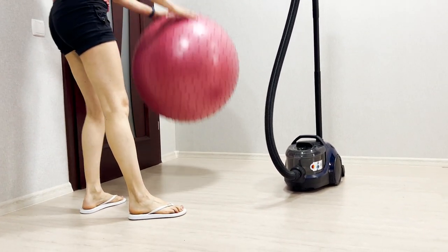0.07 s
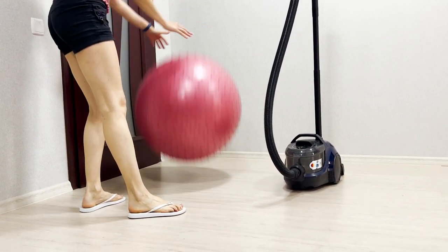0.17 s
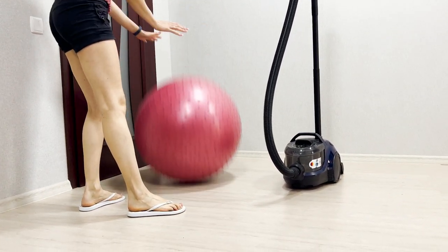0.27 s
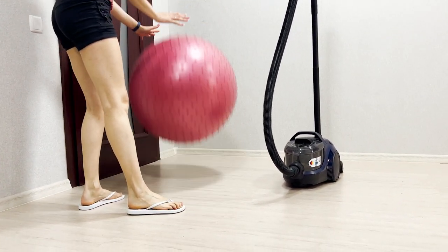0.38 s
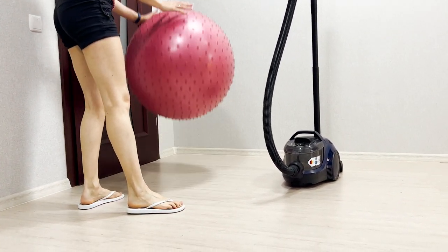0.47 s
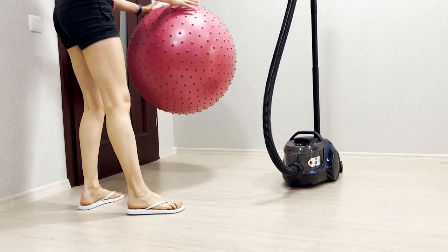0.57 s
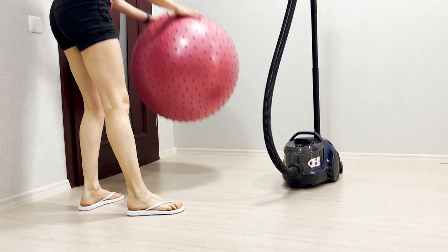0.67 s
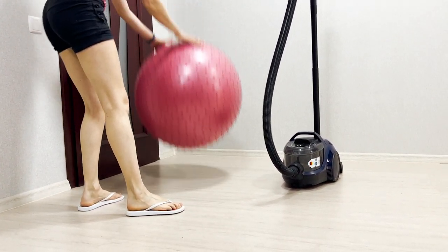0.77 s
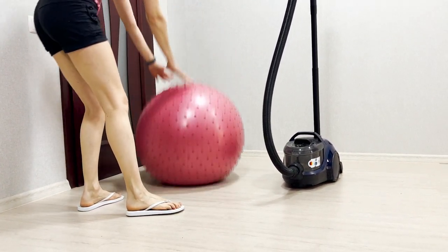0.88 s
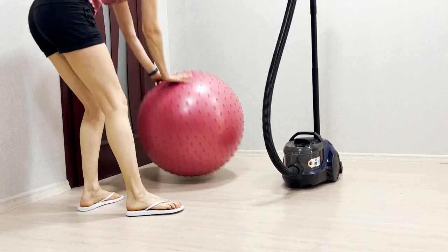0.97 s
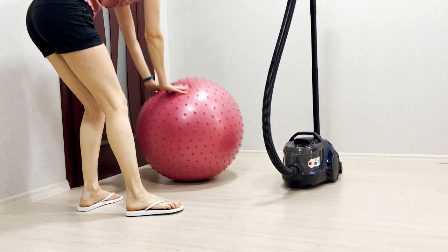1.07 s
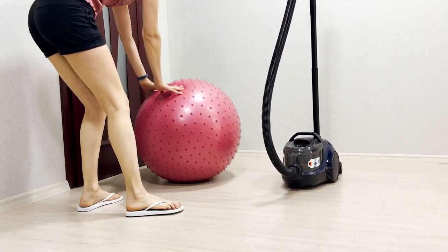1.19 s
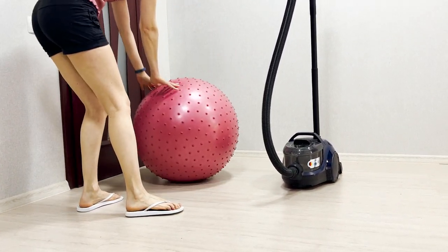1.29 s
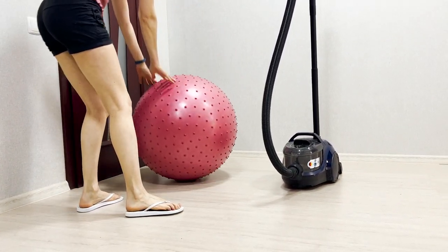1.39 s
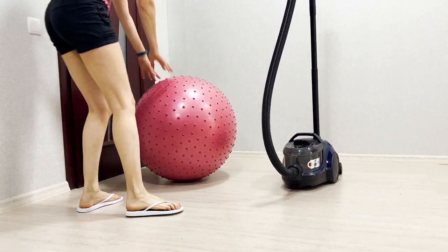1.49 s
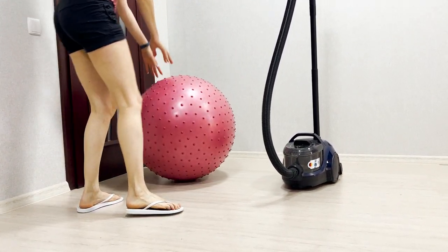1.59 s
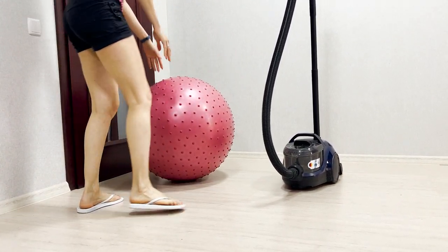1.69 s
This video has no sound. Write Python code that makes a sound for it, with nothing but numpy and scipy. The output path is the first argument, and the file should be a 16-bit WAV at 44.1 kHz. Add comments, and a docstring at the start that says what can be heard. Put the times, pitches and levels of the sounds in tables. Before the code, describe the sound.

A big air-filled rubber ball bounces on a hard floor in a small bare room, heard close in stereo. A dull hand pat at 0.02 s, then a loud slapping, booming landing at 0.25 with hollow ring. Soft pat at 0.45, faint ticks near 0.6, a weaker, pingy landing at 0.88, catching pats, a muffled thud at 1.02, then nudges, rubbing and rustle until about 1.5 over quiet room tone.

```python
"""Rubber ball on a hard floor

A big air-filled ball bounces in a small bare room, heard on a close pair of microphones, then is caught.
Each landing is a noise slap of the skin, a thump as the ball squashes and a ring of decaying air modes.
Hand pats are dulled thuds and brushes, the first with low swells after it; nudges and rubbing steady it.
The contacts have fading noise echoes, each landing adds a low boom, and a quiet room tone lies below."""
import sys
import numpy as np
from scipy import signal
from scipy.fft import rfft, irfft, next_fast_len
from scipy.io import wavfile

SR = 44100
rng = np.random.default_rng(int(sys.argv[2]) if len(sys.argv) > 2 else 0)


def unload_audio(sound):
    """Save the sound as a 16-bit wav file, at the path given as the first command line argument."""
    columns = np.transpose(np.atleast_2d(sound))
    # keep every value between -1 and 1, then stretch to whole-number steps
    steps = np.round(np.clip(columns, -1, 1) * 32767)
    wavfile.write(sys.argv[1], SR, steps.astype(np.int16))


N = 74970
T = np.arange(N) / SR
SIZE = 2 * next_fast_len(N)
HZ = np.maximum(np.fft.rfftfreq(SIZE, 1 / SR), 1)

# Landings on the floor [t/s, slap level/dB, slap fall/s, crack level/dB re slap, slap low-pass f/Hz,
# thump level/dB, squash/s, rebound level/dB, boom level/dB, air ring level/dB, high ping level/dB]
BOUNCES = [(.246, -14.5, 0.0054, 6, 8070, -14, 0.016, -4.5, -21, -21.5, -37.5),
           (.883, -17.5, 0.0087, 4, 6400, -19, 0.0063, -41.5, -18, -35, -20),
           (1.021, -25.5, 0.019, -33.5, 2080, -23, 0.03, -17, -23, -52, -30.5)]
# Slap of the skin [f/Hz, relative level/dB per Hz]
SLAP = [(150, -6.5), (400, -0.5), (560, -5), (1050, -1.5), (1450, -1), (1800, -4.5), (2500, -8.5),
        (3200, -12), (4200, -19.5), (5600, -29.5), (8200, -28), (10000, -56.5), (12500, -29), (15500, -38)]
SLAP_RISE_S, SLAP_WET_DB = 0.0079, -1
# First crack of skin on floor [f/Hz, relative level/dB per Hz]
CRACK = [(200, -16), (750, 2), (1400, 1), (2500, 0.5), (3400, -5.5), (4800, -17.5), (6000, -30),
         (9500, -49.5), (15000, -46.5)]
CRACK_AFTER_S, CRACK_WIDTH_S = 0.0036, 0.0025
# Thump of the squashed ball, also under pats and nudges [f/Hz, relative level/dB per Hz]
THUMP = [(25, -33), (45, -36), (70, -9.5), (115, -4), (170, -4), (260, -7), (360, -12), (520, -28.5),
         (1200, -72.5)]
THUMP_FALL_S, THUMP_WET_DB = 0.024, -1.5
# Low modes of ball and room, also in the pats and swells [f/Hz, level/dB, t60/s]
BODY = [(85.1, -6.5, 0.63), (110.96, 4.5, 0.31), (140.9, -7, 0.098), (164.3, -5.5, 0.25),
        (204.4, -10.5, 0.5), (236.4, -3, 0.28), (285.6, -14.5, 0.44), (325, -20.5, 0.45)]
BODY_RISE_S, BODY_DB = 0.026, 1  # level re the thump
# First push of air as the ball flattens; level re the thump
PUSH_S, PUSH_HZ, PUSH_WIDTH_S, PUSH_DB = 0.009, 181, 0.0033, 3.5
REBOUND_S, REBOUND_HZ, REBOUND_WIDTH_S = 0.02304, 133, 0.0075
# Air inside the ball [f/Hz, level/dB, t60/s]
AIR = [(367, 1.5, .36), (460, -9, .28), (660, -5, .3), (877, -9, .33), (1071, -4, .32), (1305, -12, .33),
       (1776, -7, .33), (2211, -7, .3), (2329, -9, .32), (2499, -10, .32), (2866, -8, .26)]
# High pings of the taut ball [f/Hz, level/dB, t60/s]
PING = [(1019, -8.5, 0.25), (1696, 0.5, 0.27), (1724, -5.5, 0.33), (1780, -13.5, 0.51), (2016, -6, 0.16)]
# Weak, long after-ring of the many high air modes [f/Hz, relative level/dB per Hz]
SHIMMER = [(500, -39), (1000, -0.5), (1700, -7), (2800, -2), (3900, -10.5), (5500, -31), (9000, -49)]
SHIMMER_DB, SHIMMER_T60_S = -27.5, 1.274  # level re the slap; decay before the catch
CAUGHT_S, CAUGHT_T60_S = 0.89, 0.33  # extra damping of the after-ring from the catch on
BOOM_HZ, BOOM_T60_S, BOOM_RISE_S = 55.97, 0.8, 0.026


def landings():
    """Skin slaps the floor, the ball squashes and rebounds, air and room ring; hands damp the shimmer."""
    out = 0
    boom = ring([(BOOM_HZ, 0, BOOM_T60_S)]) * rise(BOOM_RISE_S)
    hand_damping = 1000 ** (-np.maximum(T - CAUGHT_S, 0) / CAUGHT_T60_S)
    for (s, slap_db, fall_s, crack_db, dull_hz, thump_db, squash_s,
         rebound_db, boom_db, air_db, ping_db) in BOUNCES:
        crack_shape = np.exp(-((T - CRACK_AFTER_S) / CRACK_WIDTH_S) ** 2)
        crack = undb(crack_db) * noise(CRACK) * crack_shape
        skin = burst(SLAP, SLAP_RISE_S, fall_s, SLAP_WET_DB)
        slap = dull(crack + skin, dull_hz, order=1)

        squash = burst(THUMP, squash_s, THUMP_FALL_S, THUMP_WET_DB)
        body = undb(BODY_DB) * ring(BODY) * rise(BODY_RISE_S)
        push = undb(PUSH_DB) * swing(PUSH_S, PUSH_HZ, PUSH_WIDTH_S)
        thump = squash + body - push
        rebound = undb(rebound_db) * swing(REBOUND_S, REBOUND_HZ, REBOUND_WIDTH_S)

        hollow = (undb(air_db) * ring(AIR) + undb(ping_db) * ring(PING)) * rise(SLAP_RISE_S)
        shimmer = undb(slap_db + SHIMMER_DB) * noise(SHIMMER) * 1000 ** (-T / SHIMMER_T60_S)
        landing = undb(slap_db) * slap + undb(thump_db) * thump + rebound + undb(boom_db) * boom + hollow
        out = out + at(landing, s) + hand_damping * at(shimmer, s)
    return out


# Hand pats on the ball; the rows at 0.076 and 0.138 s are low swells of its ringing after the first pat
# [t/s, thud level/dB, onset/s, low-pass f/Hz of thud and wobble, wobble level/dB, skin brush level/dB]
PATS = [(.020, -23, .005, 139, -21.5, -41), (0.076, -38.5, 0.012, 108.8, -35, -67),
        (0.138, -39.5, 0.02, 108.8, -36.5, -73.5), (0.448, -29.5, 0.024, 430, -40.5, -47.5),
        (.678, -36.5, 0.012, 430, -42.5, -59.5), (0.721, -41.5, 0.015, 265.5, -40, -78.5),
        (0.834, -43.5, 0.015, 200, -48, -78), (0.937, -29, .008, 286, -32, -40.5),
        (0.967, -21.5, 0.0037, 215, -25, -63.5)]
PAT_FALL_S = 0.022
# Skin brush and rustle [f/Hz, relative level/dB per Hz]
FINGER = [(200, 15.5), (1000, 1), (2000, 0), (3400, -5), (4700, -6.5), (5900, -10.5), (7000, -11),
          (8800, -16), (10000, -37), (12500, -10), (15500, -39)]
# Sliding of hands and clothes [t/s, level/dB]
RUSTLE = [(0, -52), (.2, -58), (.6, -72), (.74, -63.5), (.85, -55.5), (1.1, -48), (1.26, -56),
          (1.31, -62.5), (1.39, -59.5), (1.5, -105), (1.63, -79), (1.7, -74)]
# Fingertip click on the skin [f/Hz, relative level/dB per Hz]
TAP_COLOUR = [(500, -4.5), (3000, -11), (4600, 2), (5900, -7), (7200, -7), (8800, -12), (10000, -30),
              (12500, -7.5), (15500, -20)]
TAP_S, TAP_DB = 0.0325, -33


def pats_and_rustle():
    """Pats and low swells: thud, wobble and skin brush; a fingertip clicks; hands and clothes rustle."""
    rustle = noise(FINGER) * undb(np.interp(T, *np.array(RUSTLE).T))
    out = rustle
    for s, thud_db, onset_s, dull_hz, wobble_db, brush_db in PATS:
        thud = undb(thud_db) * burst(THUMP, onset_s, PAT_FALL_S, wet_db=-11.0)
        modes = undb(-6.0) * ring(BODY) * rise(onset_s)
        wobble = undb(wobble_db) * (modes + swing(after_s=0.012, hz=91, width_s=0.013))
        brush = undb(brush_db) * burst(FINGER, rise_s=0.0027, fall_s=0.03, wet_db=2.0)
        out = out + at(dull(thud + wobble, dull_hz) + brush, s)
    tap = undb(TAP_DB) * burst(TAP_COLOUR, rise_s=0.002, fall_s=0.004, wet_db=-7.0)
    return out + at(tap, TAP_S)


# Short pushes on the held ball [t/s, level/dB]
NUDGES = [(1.099, -20.5), (1.222, -33), (1.317, -36), (1.376, -33), (1.420, -34), (1.454, -45)]
NUDGE_HZ, NUDGE_WIDTH_S, NUDGE_THUD_DB = 99, 0.01, -14.5  # thud level re the push


def nudges():
    """The held ball is nudged into place: each push is a short swing of pressure and a dull thud."""
    out = 0
    for s, db in NUDGES:
        push = swing(s, NUDGE_HZ, NUDGE_WIDTH_S)
        thud = noise(THUMP) * rise(NUDGE_WIDTH_S) * np.exp(-T / PAT_FALL_S)
        out = out + undb(db) * (push + undb(NUDGE_THUD_DB) * at(thud, s))
    return out


# Skin dragging on the floor as the ball is steadied [t/s, level/dB]
DRAG = [(1.0, -88), (1.15, -50.5), (1.3, -59), (1.43, -55), (1.49, -63.5), (1.54, -99), (1.7, -102)]
# Its colour [f/Hz, relative level/dB per Hz]
DRAG_COLOUR = [(60, -7.5), (300, 5.5), (550, -9.5), (1100, -10), (2000, -20.5), (4000, -28.5),
               (9000, -53.5)]


def drag():
    """The held ball rubs softly on the floor: coloured friction noise with a moving level."""
    times, levels_db = np.array(DRAG).T
    return noise(DRAG_COLOUR) * np.interp(T, times, undb(levels_db), left=0)


# Faint dry ticks [t/s, level/dB]
TICKS = [(.578, -38), (0.617, -38)]


def ticks():
    """Small dull clicks: very short swings of pressure with no echo."""
    tick = swing(after_s=0.00084, hz=685, width_s=0.00046)
    return sum(undb(db) * at(tick, s) for s, db in TICKS)


# Quiet of the room [f/Hz, relative level/dB per Hz]
QUIET = [(15, -42.5), (25, -6.5), (86, -3), (573, -33), (927, -17), (1280, -23.5), (1630, -22),
         (1960, -35.5), (10000, -51)]
QUIET_DB = -64


def room_tone():
    """Steady, mostly low noise under everything."""
    return undb(QUIET_DB) * noise(QUIET)


# Decay of the small bare room [f/Hz, t60/s]
ROOM = [(60, 0.12), (150, 0.6), (400, 0.25), (1000, 0.38), (2500, 0.46), (5000, 0.39), (9000, 0.3),
        (15000, 0.26)]
ROOM_BUILD_S = 0.0095


def room_tail(spectrum):
    """Diffuse echo: every octave band of noise fades with the decay time of the room."""
    source, out = rfft(noise(spectrum), SIZE), 0
    octaves = np.arange(4, 15)  # band centres at 2 ** k Hz
    for k in octaves:
        share = np.interp(np.log2(HZ), octaves, octaves == k)  # overlapping triangular bands
        band = irfft(source * share)[:N]
        out = out + band * 1000 ** (-T / curve(ROOM, 2. ** k))
    return out * rise(ROOM_BUILD_S)


def burst(spectrum, rise_s, fall_s, wet_db):
    """A short contact noise with its echo, both under the same smooth onset."""
    contact = noise(spectrum) * np.exp(-np.maximum(T - rise_s, 0) / fall_s)
    echo = undb(wet_db) * room_tail(spectrum)
    return rise(rise_s) * (contact + echo)


def swing(after_s, hz, width_s):
    """Brief swing of air pressure, a sine under a bell-shaped envelope centred at after_s."""
    t = T - after_s
    return np.sin(2 * np.pi * hz * t) * np.exp(-(t / width_s) ** 2)


def ring(modes):
    """Struck modes, each dying at its own rate."""
    return sum(undb(db - 60 * T / t60) * np.sin(2 * np.pi * hz * T) for hz, db, t60 in modes)


def noise(spectrum):
    """Noise of rms 1 with the given colour."""
    x = irfft(rfft(rng.standard_normal(SIZE)) * undb(curve(spectrum)))[:N]
    return x / x.std()


def dull(x, hz, order=2):
    """Low-pass: a softer contact."""
    return signal.sosfilt(signal.butter(order, min(hz, SR / 2 - 100), fs=SR, output="sos"), x)


def rise(s):
    """Smooth onset lasting about s seconds."""
    return 1 - np.exp(-(T / s) ** 2)


def at(x, s):
    """Start a sound at s seconds."""
    return np.concatenate([np.zeros(max(int(s * SR), 0)), x])[:N]


def curve(table, hz=HZ):
    """Read (f/Hz, value) points on a log-frequency axis."""
    f, v = np.array(table, float).T
    return np.interp(np.log(hz), np.log(f), v)


def undb(db):
    """Decibels to gain."""
    return 10 ** (np.asarray(db) / 20)


# Close microphone pair, left minus right [f/Hz, level/dB]
TILT = [(60, -2.1), (110, -2.3), (200, -2.2), (380, 1.5), (520, 11), (700, 11), (1290, 2.5), (2380, 4),
        (4400, 6), (8120, 0), (15000, 0)]
# Phase by which left leads right [f/Hz, phase/rad]
LEAD = [(60, 0.5), (160, 0.3), (300, 0.64), (450, 1.82), (690, -1), (1030, -1.1), (1460, -2.5),
        (1720, 0.34), (2930, 0.73), (4900, 0.28), (8000, 2), (12500, 1.76)]
# Part unrelated between left and right, re the common part [f/Hz, level/dB]
SPREAD = [(100, -21), (250, -20.5), (500, -2), (1000, -8.5), (2000, -16), (4000, -8), (12000, -20)]
SCATTER_S = 0.06


def microphones(x):
    """Two close microphones hear one sound with their own colour, phase and a short random scatter."""
    scatter = rng.standard_normal(N) * np.exp(-T / SCATTER_S)
    apart = rfft(scatter / np.linalg.norm(scatter), SIZE) * undb(curve(SPREAD))
    lean = undb(curve(TILT) / 2)  # half the difference to each side
    turn = np.exp(1j * curve(LEAD) / 2)
    sound = rfft(x, SIZE) / np.sqrt((lean ** 2 + lean ** -2) / 2)  # keeps the mean power of the pair
    left = sound * (1 + apart) * lean * turn
    right = sound * (1 - apart) / lean / turn
    return irfft(np.array([left, right]))[:, :N]


def scene():
    """Ball and hands over the quiet of the room, heard by the close pair."""
    ball = landings() + nudges() + drag()
    return microphones(ball + pats_and_rustle() + ticks() + room_tone())


TOP_HZ = 15200


def record(dry):
    """The recorder rounds peaks near full scale and cuts the top with a steep low-pass."""
    rounded = dry / (1 + dry ** 8) ** (1 / 8)
    return signal.sosfilt(signal.ellip(8, .2, 70, TOP_HZ, fs=SR, output="sos"), rounded)


dry = scene()
out = record(dry)
unload_audio(out)
```